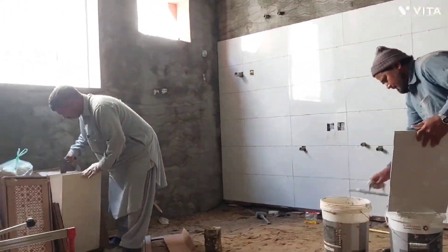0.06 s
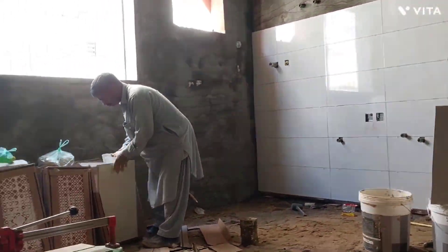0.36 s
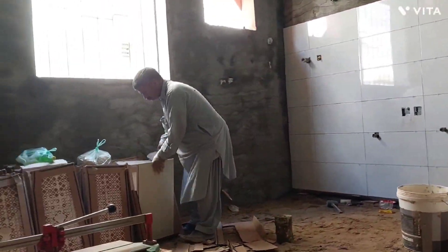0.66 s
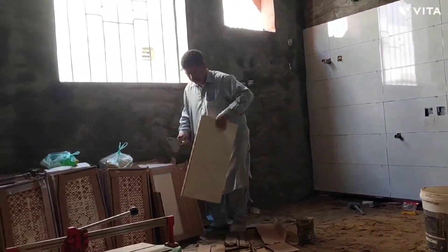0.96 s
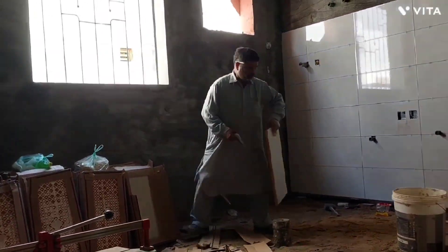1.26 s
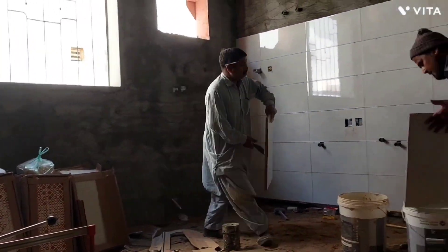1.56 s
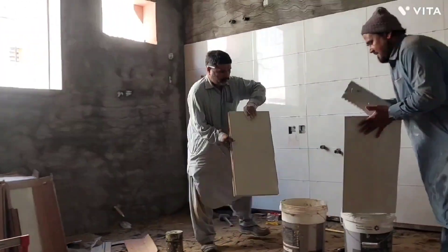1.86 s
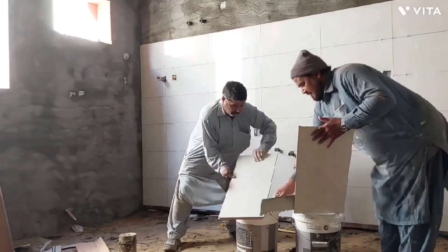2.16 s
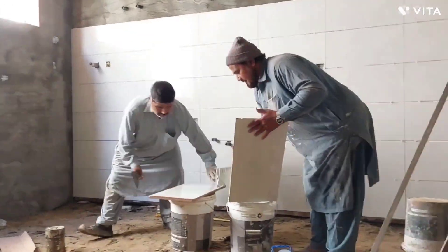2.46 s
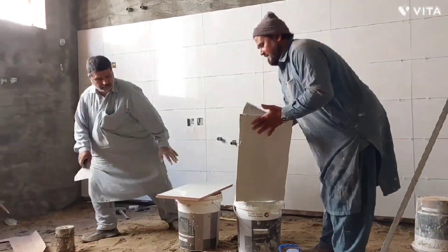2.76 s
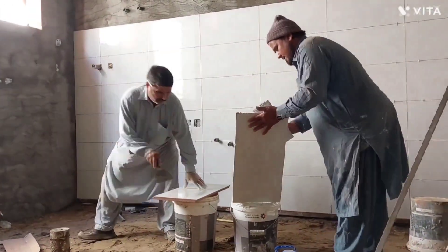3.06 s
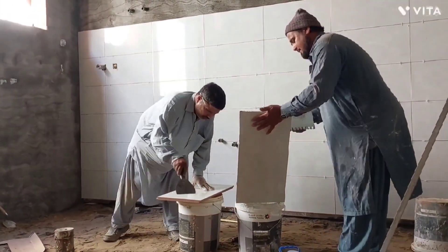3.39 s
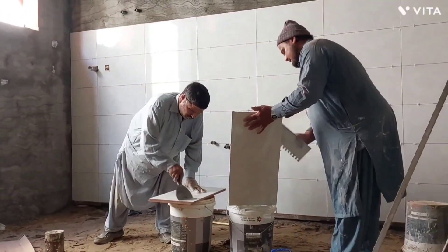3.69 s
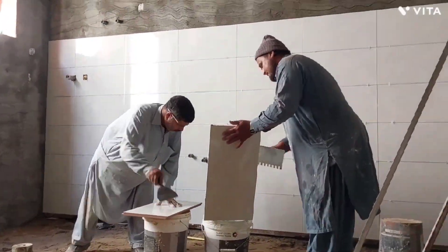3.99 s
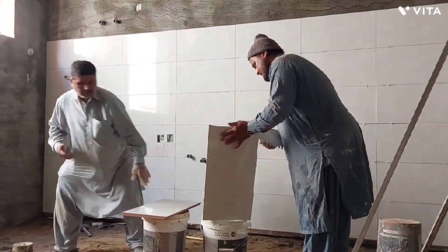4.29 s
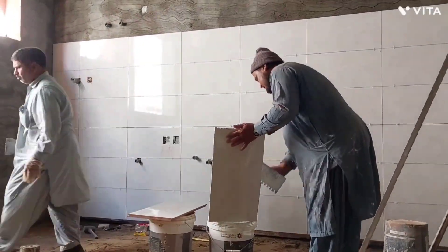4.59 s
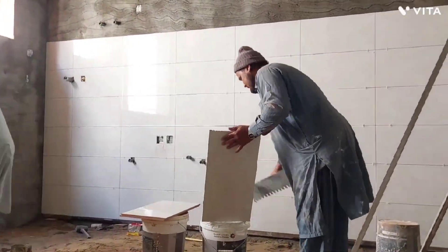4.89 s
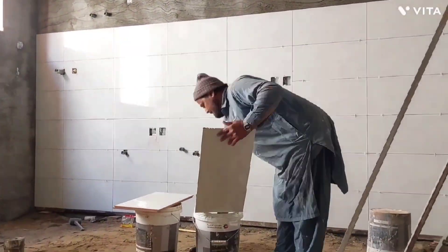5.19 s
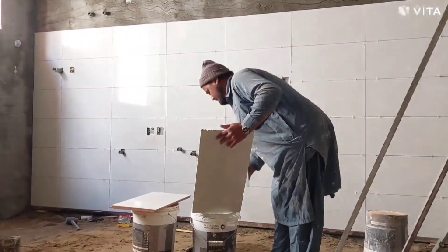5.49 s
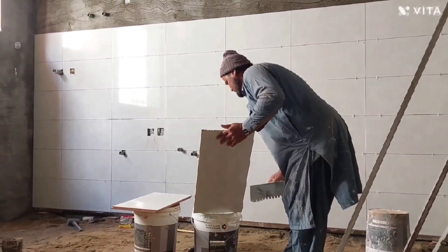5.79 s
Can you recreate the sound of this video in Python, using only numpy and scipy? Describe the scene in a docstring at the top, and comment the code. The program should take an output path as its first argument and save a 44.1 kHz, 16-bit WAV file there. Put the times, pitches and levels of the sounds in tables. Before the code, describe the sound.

Short, sandy trowel scrapes and jabs on tile backs, with faint metal squeaks, shoes on grit and hollow bucket knocks in a bare room.

```python
"""Tilers buttering tiles

Two tilers spread cement mortar on ceramic tiles in a bare, half-tiled room. Each trowel stroke bites
into the sand, drags it over the tile back and lifts off; short jabs make the blade ring and squeak.
Shoes scuff and thud on the gritty floor, and a tile is slid onto a plastic bucket, which booms."""
import sys
import numpy as np
from scipy import signal
from scipy.fft import rfft, irfft, next_fast_len
from scipy.io import wavfile

SR = 44100
rng = np.random.default_rng(int(sys.argv[2]) if len(sys.argv) > 2 else 0)


def file_out(sig):
    """Save sig as 16-bit WAV at sys.argv[1]."""
    # one column per channel
    cols = np.atleast_2d(sig).T
    # limit, then scale
    lim = np.clip(cols, -1, 1)
    pcm = np.round(lim * 32767).astype(np.int16)
    wavfile.write(sys.argv[1], SR, pcm)


N = 266805
TIME = np.arange(N) / SR
FFT_SIZE = next_fast_len(N, True)
HZ = np.maximum(np.arange(FFT_SIZE // 2 + 1) * SR / FFT_SIZE, 1)


def from_db(db):
    """Decibels to gain."""
    return 10 ** (np.asarray(db) / 20)


def unit_rms(x):
    """Scale to unit power."""
    return x / np.sqrt(np.mean(x ** 2) + 1e-20)


def over_hz(points):
    """Join (freq_hz, value) points on a log-frequency axis."""
    hz, value = np.transpose(points)
    return np.interp(np.log(HZ), np.log(hz), value)


def shaped(x, gain):
    """Filter by a frequency response."""
    spectrum = rfft(x.astype(np.float32), FFT_SIZE)
    return irfft(spectrum * gain.astype(np.float32), FFT_SIZE)[..., :N]


def drift(rate_hz, hop=32):
    """Smooth random wander of unit RMS."""
    pole = np.exp(-2 * np.pi * rate_hz * hop / SR)
    slow = signal.lfilter([1], [1, -2 * pole, pole * pole], rng.standard_normal(N // hop + 1002))[1000:]
    return np.interp(np.arange(N) / hop, np.arange(len(slow)), unit_rms(slow))


def resonances(modes):
    """Gain of resonances that add in power."""
    return np.sqrt(sum(from_db(db) ** 2 / (1 + ((HZ ** 2 - hz ** 2) / (HZ * width_hz)) ** 2)
                       for hz, width_hz, db in modes))


def swell(peak_s, rise_s, fall_s):
    """Contact without drag: bell-shaped rise, exponential fall."""
    age_s = TIME - peak_s
    return np.exp(-np.minimum(np.where(age_s < 0, (age_s / rise_s) ** 2, age_s / fall_s), 20))


# left-right likeness: freq_hz, correlation
COHERENCE = [(60, 0.74), (350, 0.86), (750, 0.99), (1200, 0.15), (3000, 0.05), (5800, 0.028), (7200, .82),
             (9300, 0.95), (10200, 0.19), (12000, 1), (15500, .35)]
def stereo(pair, lag_s=0.00021, lag_below_hz=2600):
    """Mix two unrelated signals into left and right; the lows reach the right late."""
    alike = np.clip(over_hz(COHERENCE), -.99, .99)
    mid, side = rfft(pair, FFT_SIZE) * np.sqrt([1 + alike, 1 - alike])
    delay = np.exp(-2j * np.pi * HZ * lag_s * (HZ < lag_below_hz))
    return irfft([mid + side, (mid - side) * delay], FFT_SIZE)[:, :N] / np.sqrt(2)


# still air: freq_hz, density_db
AIR_COLOUR = [(15, -40), (25, -20), (64, 9.5), (185, -11), (249, 5.5), (301, -17), (326, -13), (545, -25.5),
              (1130, -24.5), (1480, -24.5), (1790, -26), (14400, -40.5), (16000, -51)]
def room_air(level_db=-62):
    """Steady, low hush of the room."""
    noise = stereo(rng.standard_normal((2, N)))
    return from_db(level_db) * unit_rms(shaped(noise, from_db(over_hz(AIR_COLOUR))))


def room(x, t60_s=0.2, wall_hz=5000, wet_db=-14, late_t60_s=0.73, late_db=-24.5):
    """Add dense, dulled wall reflections and a faint late echo from the rest of the building."""
    echoes = shaped(stereo(rng.standard_normal((2, N))), 1 / np.hypot(1, HZ / wall_hz))
    decay = (from_db(-60 * TIME / t60_s) + from_db(late_db - 60 * TIME / late_t60_s)) * (TIME > .004)
    response = (echoes * decay / np.sqrt(np.sum(decay ** 2)))[:, :SR // 2]
    return x + from_db(wet_db) * signal.fftconvolve(x, response, axes=1)[:, :N]


def thuds(blows, modes, rise_cycles, spread_octaves, rattle_db):
    """Soft blows build over a few cycles and excite the modes near their pitch; loose contact rattles."""
    forces = np.array([from_db(db) * swell(peak_s, rise_cycles / hz, fall_s)
                       for peak_s, db, fall_s, hz in blows])
    mode_hz, _, mode_db = np.transpose(modes)
    blow_hz = np.array(blows)[:, -1:]
    weights = from_db(mode_db) / (1 + (np.log2(mode_hz / blow_hz) / spread_octaves) ** 4)
    weights /= np.linalg.norm(weights, axis=1, keepdims=True)
    envelopes = np.sqrt(weights.T ** 2 @ forces ** 2)
    out = 0
    for envelope, (hz, width_hz, _) in zip(envelopes, modes):
        phase = 2 * np.pi * np.cumsum(hz + width_hz / 3 * drift(23.57)) / SR
        rattle = from_db(rattle_db) * drift(93) * np.cos(phase)
        out += envelope * np.sqrt(2) * (np.sin(phase) + rattle)
    return out


# footfalls: peak_s, level_db, fall_s, pitch_hz
STEPS = [(0.59, -44, 0.14, 154), (0.938, -35, 0.028, 103.4), (1.08, -49, 0.095, 163.2),
         (1.36, -46, 0.11, 109), (1.48, -33.5, .039, 165), (3.176, -43.5, .026, 208),
         (4.19, -48.5, .024, 129), (4.45, -68.5, .1, 108), (4.88, -40, 0.06, 253),
         (5.295, -37.5, 0.065, 162.7)]
# floor and room modes: pitch_hz, width_hz, level_db
FLOOR_MODES = [(79.8, 22, -1.5), (131, 29, -1.5), (197, 36, -17), (231, 28.8, -1.5), (373, 33, -3)]
def footsteps():
    """Shoes thud into the low modes of floor and room."""
    return thuds(STEPS, FLOOR_MODES, rise_cycles=4, spread_octaves=1.0, rattle_db=-4.5)


# tile on bucket: peak_s, level_db, fall_s, pitch_hz
BUMPS = [(2.312, -25.5, 0.027, 238), (2.32, -36.5, 0.13, 80), (2.518, -25, 0.052, 320),
         (2.54, -35.5, 0.079, 90), (2.578, -26, .02, 251.3), (2.612, -25, 0.0077, 178.4),
         (2.685, -40.5, .018, 154.8), (5.67, -30.5, 0.059, 267), (5.96, -32.5, .05, 280)]
# bucket modes: pitch_hz, width_hz, level_db
BUCKET_MODES = [(75, 24, -4.5), (123, 36, -3), (199.4, 25, -8), (230.8, 28, 0), (318, 49.5, -1),
                (498, 55, -14), (778, 37, -21.5)]
def bucket_bumps():
    """A tile knocks the plastic bucket, which booms."""
    return thuds(BUMPS, BUCKET_MODES, rise_cycles=2.7, spread_octaves=0.61, rattle_db=-0.5)


# lift-offs: start_s, level_db
LIFTS = [(0.23, -57.5), (3.51, -60), (4.135, -47.5)]
# free blade modes: pitch_hz, level_db, t60_s
FREE_BLADE_MODES = [(1917, 3, 0.17), (2556, -14, 0.33), (2929, 0, 0.16), (3680, -4.5, 0.15),
                    (6060, -22.5, 0.5), (8500, -15, 0.27)]
def blade_rings():
    """Freed from the mortar, the steel rings on faintly."""
    flicks, out = np.zeros(N), 0
    for start_s, db in LIFTS:
        flicks[round(start_s * SR)] = from_db(db)
    for hz, db, t60_s in FREE_BLADE_MODES:
        radius, angle = from_db(-60 / (t60_s * SR)), 2 * np.pi * hz / SR
        poles = [1, -2 * radius * np.cos(angle), radius ** 2]
        out += from_db(db) * signal.lfilter([0, np.sin(angle)], poles, flicks + 1e-18)
    return out


# stick-slip tones: peak_s, level_db, rise_s, pitch_hz
SQUEALS = [(0.045, -38, 0.023, 394), (0.181, -29, 0.0098, 395), (0.208, -30, 0.013, 2283),
           (0.3, -44, 0.024, 390), (1.897, -30.5, 0.024, 659), (2.448, -20.5, .03, 342),
           (2.57, -32.5, .069, 768), (3.484, -33, 0.0095, 3010), (3.502, -31.5, 0.015, 2206),
           (3.93, -30.5, .018, 2966), (4.0, -33.5, .022, 876), (5.514, -37.5, .031, 350),
           (5.963, -37, 0.017, 2290)]
def squeals(waver=.014, rough_db=3.5, fall_s=.015):
    """Slips briefly fall in step with one mode and sing, slightly unsteady."""
    warped_s = np.cumsum(1 + waver * drift(60)) / SR
    tones = sum(from_db(db) * swell(peak_s, rise_s, fall_s) * np.sin(2 * np.pi * hz * warped_s)
                for peak_s, db, rise_s, hz in SQUEALS)
    return np.sqrt(2) * tones * from_db(rough_db * drift(90))


# edge judders: peak_s, level_db, rise_and_fall_s, pitch_hz
CHATTERS = [(1.856, -23, 0.016, 742), (1.893, -29, 0.054, 488), (2.314, -27, .03, 934),
            (2.579, -32.5, 0.014, 623), (2.865, -25, 0.023, 698), (2.931, -24, 0.035, 838),
            (2.92, -26, 0.044, 2100), (3.98, -35, 0.044, 893), (5.596, -26, 0.014, 1826),
            (5.713, -33, 0.028, 664), (5.972, -35, .017, 2450)]
def chatters(grains, width_ratio=0.47):
    """Pressed harder, the edge judders in one broad resonance set by its place on the tile."""
    out = 0
    for peak_s, db, ramp_s, hz in CHATTERS:
        band = signal.butter(1, [hz * (1 - width_ratio / 2), hz * (1 + width_ratio / 2)], "band", fs=SR)
        judder = unit_rms(signal.lfilter(*band, signal.lfilter(*band, grains)))
        out += from_db(db) * swell(peak_s, ramp_s, ramp_s) * judder
    return out


def mode_ripple(spacing_hz=75, depth_db=4.6):
    """One contact point favours some of a plate's close modes and misses others."""
    grid_hz = np.arange(0, SR / 2, spacing_hz)
    ripple = np.interp(HZ, grid_hz, rng.uniform(-1.7, 1.7, 1200)[:len(grid_hz)])
    return unit_rms(from_db(depth_db * ripple * HZ / (HZ + 300)))


def travelling(grains, points=4):
    """The edge travels over the plate, so the favoured modes keep changing."""
    nearness = np.array([np.exp(2 * drift(7)) for _ in range(points)])
    nearness /= nearness.sum(axis=0)
    return unit_rms(sum(near * shaped(grains, mode_ripple()) for near in nearness))


def grit(grains_per_s, size_db, paste_db, slip_db, slip_hz):
    """Sand grains crack over a smooth smear of paste; the edge sticks and slips."""
    sizes = from_db(size_db * np.minimum(rng.exponential(1, N), 3))
    struck = rng.random(N) < grains_per_s / SR
    cracks = unit_rms(sizes * struck * np.sign(rng.standard_normal((2, N))))
    paste = from_db(paste_db) * rng.standard_normal((2, N))
    rubbing = travelling(stereo(cracks + paste))
    return unit_rms(rubbing * from_db(slip_db * np.clip(drift(slip_hz), -2, 2)))


def pressure(age_s, rise_s, drag_s, fall_s):
    """Pressure comes on until age zero, holds through the drag, then lets go."""
    onset = (np.maximum(-age_s, 0) / rise_s) ** 1.09
    release = np.maximum(age_s - drag_s, 0) / fall_s
    return np.exp(-np.minimum(onset + release, 20))


def stroke_gains(strokes, falls_s, hollowing_db, dulling_db):
    """Body, rasp and hiss envelopes, in the order of falls_s; heaping mortar hollows and dulls a stroke.
    level_db is the rasp at mid-drag, body_db and hiss_db are relative to it, swell_db spans the drag."""
    power = np.zeros((3, N))
    for contact_s, rise_s, drag_s, level_db, swell_db, body_db, hiss_db, _ in strokes:
        span = slice(*np.searchsorted(TIME, [contact_s - 4 * rise_s, contact_s + drag_s + .3]))
        age_s = TIME[span] - contact_s
        along = np.clip(age_s / drag_s, 0, 1) - .5
        offsets_db = [body_db + hollowing_db * along, 0, hiss_db - dulling_db * along]
        for band, (offset_db, fall_s) in enumerate(zip(offsets_db, falls_s)):
            gain = from_db(level_db + swell_db * along + offset_db)
            power[band, span] += (gain * pressure(age_s, rise_s, drag_s, fall_s)) ** 2
    return np.sqrt(power)


def friction(gains, grains, colour, modes, ring_db, bands_db):
    """Grains drive the rubbed object's modes in three bands: body, rasp, hiss."""
    tone = np.hypot(from_db(over_hz(colour)), from_db(ring_db) * resonances(modes))
    above_body, above_rasp = 1 / (1 + (1300 / HZ) ** 6), 1 / (1 + (6500 / HZ) ** 8)
    shares = [1 - above_body, above_body - above_rasp, above_rasp]
    ranges_hz = [(400, 1300), (1300, 6000), (7000, 16000)]
    out = 0
    for share, (low_hz, high_hz), gain, db in zip(shares, ranges_hz, gains, bands_db):
        band_rms = np.sqrt(np.mean(tone ** 2 * (HZ > low_hz) * (HZ < high_hz)))
        out += from_db(db) * gain * shaped(grains, share * tone / band_rms)
    return out


# slides on grit: contact_s, rise_s, drag_s, level_db, swell_db, body_db, hiss_db, bite_db
SCUFFS = [(0.327, 0.017, .16, -63.5, -8, 4, -5.5, -21), (0.54, 0.03, 0.19, -40.5, 1, -0.5, -3.5, -18),
          (0.572, .006, 0.014, -28, -3, -11, -1.5, -8), (0.76, .03, .12, -54, -15, 3, 1, -18.5),
          (0.911, 0.0068, .025, -42.5, 0.5, -1.5, -11.5, -1.5),
          (0.961, .003, 0.063, -44, 3.5, 1.5, -6.5, 6), (1.042, 0.033, 0.032, -32.5, -1, 1.5, -4, -17.5),
          (1.306, 0.0058, 0.013, -56, 4.5, 6, -8, 6.5), (1.345, 0.012, 0.017, -44.5, -4, -2.5, 0, -16.5),
          (1.404, 0.013, 0.006, -42, -12.5, 4, 0.5, -7), (1.485, 0.022, .13, -52.5, -14.5, -5.5, -1.5, -17),
          (1.655, .02, .04, -66.5, 1.5, -20.5, 4.5, -19.5), (2.168, .006, 0.041, -53.5, 2.5, -0.5, -8, -10),
          (2.212, .009, 0.11, -31, 4.5, -10, -3, -4.5), (2.36, 0.014, 0.079, -27.5, -5.5, -4.5, -12, -15),
          (2.507, 0.0049, 0.035, -29.5, -4, 2, -16, -10), (3.161, 0.0069, 0.06, -63, -8.5, 8.5, -17, -5.5),
          (4.402, .006, 0.037, -58.5, -3, -4, -5, -10.5), (4.44, 0.0093, 0.049, -48.5, 2, 0, -12.5, -8.5),
          (4.57, .012, 0.026, -61, -6.5, -13, -18.5, -12)]
# scuff spectrum: freq_hz, density_db
SCUFF_COLOUR = [(24, -37.5), (40, -1.5), (176, -5.5), (329, 3), (615, -5), (715, 0.5), (990, -4.5),
                (1760, -8), (2150, -9), (2700, -11), (5720, -16.5), (6820, -17), (9940, -22),
                (11800, -17.5), (16000, -25)]
# sliding slab modes: pitch_hz, width_hz, level_db
SLAB_MODES = [(230, 21, 3.5), (714, 29, -32), (1231, 20, 1.5), (1873, 130, -17.5), (2290, 60, -13)]
def scuffs(sand):
    """Shoes and tiles slide on grit."""
    gains = stroke_gains(SCUFFS, falls_s=(.031, .029, .03), hollowing_db=6, dulling_db=0.5)
    return friction(gains, sand, SCUFF_COLOUR, SLAB_MODES, ring_db=-0.5, bands_db=(-1, 0.8, -3.3))


def bites(grains, strokes, low_hz=150, top_hz=7000, rise_s=.0044, fall_s=.01):
    """Each stroke opens with a crunch of coarse sand, bite_db relative to its first pressure."""
    colour = from_db(over_hz(SCUFF_COLOUR)) / np.hypot(1, HZ / top_hz) / np.hypot(1, low_hz / HZ)
    envelope = sum(from_db(level_db - swell_db / 2 + bite_db) * swell(contact_s, rise_s, fall_s)
                   for contact_s, _, _, level_db, swell_db, _, _, bite_db in strokes)
    return envelope * unit_rms(shaped(grains, colour))


# scoops: contact_s, rise_s, drag_s, level_db, swell_db, body_db, hiss_db, bite_db
DIGS = [(0.003, 0.0071, 0.046, -27.5, -9, -6, -16, -13.5), (0.153, 0.002, 0.048, -25.5, 0, -6.5, -15, -9)]
# dig spectrum: freq_hz, density_db
DIG_COLOUR = [(24, -43.5), (40, -21), (133, -4.5), (220, -31.5), (392, -1.5), (503, -20.5), (831, -7),
              (1630, -12), (2260, -6.5), (2500, -19), (2910, -19.5), (6330, -25), (16000, -29.5)]
# scooping trowel modes: pitch_hz, width_hz, level_db
SCOOP_MODES = [(375, 20, 0), (905, 60, -6), (1500, 13, -12), (2353, 50, -6), (2914, 140, -4.5),
               (3970, 39, -8.5), (3970, 310, -13.5), (4130, 56, -3.5), (4580, 58, -7), (5120, 23, -4),
               (5450, 47, -18.5), (6050, 22, -15), (6380, 120, -10.5), (6700, 82, -18), (7400, 36, -21.5),
               (8100, 84, -18)]
def digs(mortar):
    """The trowel digs into the mortar bucket."""
    gains = stroke_gains(DIGS, falls_s=(.036, .027, .028), hollowing_db=9, dulling_db=-1)
    return friction(gains, mortar, DIG_COLOUR, SCOOP_MODES, ring_db=0, bands_db=(-0.1, 1.2, -1))


# cuts into the bucket mortar: contact_s, rise_s, drag_s, level_db, swell_db, body_db, hiss_db, bite_db
BUCKET_CUTS = [(5.08, 0.028, 0.098, -69.5, 1.5, -15.5, -5.5, -19.5),
               (5.199, .008, 0.14, -53.5, -5.5, 0, -5.5, -4), (5.365, 0.0055, 0.26, -45.5, 6.5, 2.5, -9, 1.5),
               (5.576, 0.021, 0.025, -32.5, -3, 1.5, -10, -1.5), (5.667, 0.017, 0.14, -41, -13.5, 3.5, -7, -13),
               (5.853, 0.02, .085, -40.5, 1.5, 0.5, -9.5, -4), (5.957, 0.015, 0.023, -35, -5.5, -6, -14.5, -11.5),
               (6.033, 0.01, 0.016, -37, -0.5, -5.5, -13.5, -2)]
# bucket-cut spectrum: freq_hz, density_db
CUT_COLOUR = [(24, -38), (40, -10), (312, -12.5), (1040, -6), (1210, -7.5), (1440, -11.5), (1760, -8),
              (3220, -12.5), (3930, -14), (7540, -23.5), (9690, -33.5), (12800, -24), (16000, -30.5)]
# modes of the trowel cutting into the bucket mortar: pitch_hz, width_hz, level_db
CUTTING_TROWEL_MODES = [(269, 91, -1), (1210, 40, -3), (1800, 28, -19), (2090, 180, -6), (4082, 420, -12.5),
                        (4300, 45, -14), (5750, 28, -30), (6160, 140, -22), (7660, 78, -19.5)]
def bucket_cuts(sand):
    """The trowel scoops and cuts into the mortar in the bucket."""
    gains = stroke_gains(BUCKET_CUTS, falls_s=(.029, .021, .03), hollowing_db=4, dulling_db=3)
    return friction(gains, sand, CUT_COLOUR, CUTTING_TROWEL_MODES, ring_db=-0.5, bands_db=(-0.8, 0.95, -0.4))


# edge strokes: contact_s, rise_s, drag_s, level_db, swell_db, body_db, hiss_db, bite_db
JABS = [(3.479, 0.01, 0.017, -29, 4, -5.5, -10.5, -8), (3.644, 0.007, .024, -44.5, 1, -2.5, -9.5, 3.5),
        (3.899, 0.0027, .015, -35.5, 2.5, -24.5, -1.5, -10),
        (3.916, 0.006, .085, -29.5, -2.5, -5, -11.5, -16.5),
        (4.1, 0.0025, 0.021, -28.5, -0.5, -5, -11.5, -7.5)]
# jab spectrum: freq_hz, density_db
JAB_COLOUR = [(24, -44), (40, -13.5), (392, -1), (697, -10), (831, -3.5), (1020, -15.5), (1520, -3),
              (2260, -1), (2500, -3), (2980, -4), (3650, -6), (3930, -2), (9690, -40), (12800, -31),
              (16000, -38.5)]
# jabbing blade modes: pitch_hz, width_hz, level_db
BLADE_MODES = [(375, 26, -4.5), (810, 51, -4.5), (1180, 85, -4), (1328, 32, -20), (2306, 48, 2.5),
               (2940, 30, 4), (3870, 110, -8.5), (4600, 36, -24), (4100, 52, -16), (4670, 43, -8),
               (6150, 35, -18.5), (6400, 39, -16), (7040, 100, -20.5), (8210, 61, -22)]
def jabs(mortar):
    """Short jabs with the edge excite the steel blade."""
    gains = stroke_gains(JABS, falls_s=(.029, .021, .021), hollowing_db=6, dulling_db=2.5)
    return friction(gains, mortar, JAB_COLOUR, BLADE_MODES, ring_db=3, bands_db=(-0.04, 1.26, 0.5))


# buttering strokes: contact_s, rise_s, drag_s, level_db, swell_db, body_db, hiss_db, bite_db
SWEEPS = [(1.708, 0.0069, 0.045, -46.5, 5.5, 1, -7.5, -6.5),
          (1.755, .012, .075, -37, 6.5, 6.5, -5.5, -19.5), (1.837, 0.01, 0.17, -33.5, -4, 4, -6.5, -5),
          (2.755, 0.0047, 0.036, -51.5, 10, -8.5, -12, -1.5), (2.8, .005, 0.047, -34, -2.5, 1, -20, -6),
          (2.846, 0.014, 0.16, -27.5, -2.5, -4, -13.5, -15.5), (3.304, .008, 0.011, -51.5, 7, -4, -15, -6),
          (3.322, 0.0046, .025, -42, 1, -8.5, -11.5, -9), (3.354, 0.019, 0.057, -30.5, 2.5, -10, -7, -23.5),
          (4.834, 0.006, .025, -44.5, 7, -0.5, 0, -1.5), (4.865, 0.014, 0.093, -33.5, 3.5, -8, -6, -25)]
# sweep spectrum: freq_hz, density_db
SWEEP_COLOUR = [(24, -48.5), (40, -28), (99, -13), (176, -18.5), (237, -2.5), (770, -3.5), (990, -6.5),
                (1210, -4.5), (1440, -10.5), (2770, -9.5), (5310, -16), (7730, -17), (9940, -22),
                (12100, -16), (16000, -22.5)]
# buttered tile modes: pitch_hz, width_hz, level_db
TILE_MODES = [(830, 96, 0.5), (1107, 67, -12), (1685, 240, -4), (2300, 340, -8), (2640, 79, -20)]
def sweeps(mortar):
    """The trowel touches down lightly, then bears on and drags mortar over the tile."""
    gains = stroke_gains(SWEEPS, falls_s=(.028, .022, .016), hollowing_db=5, dulling_db=1)
    return friction(gains, mortar, SWEEP_COLOUR, TILE_MODES, ring_db=-3, bands_db=(-0.15, 1.53, -0.3))


# stereo balance: freq_hz, left_over_right_db
BALANCE = [(100, 1.4), (1000, -1), (2500, -1), (8000, -2), (13000, -1.2)]
def scene():
    """Feet, bucket and trowels in the room; mids and highs lean a little to the right."""
    mortar = grit(grains_per_s=5000, size_db=2.5, paste_db=0.9, slip_db=1.18, slip_hz=90)
    sand = grit(grains_per_s=4000, size_db=-0.5, paste_db=0.5, slip_db=1.45, slip_hz=70)
    reversed_sand = sand[:, ::-1]
    movement = footsteps() + bucket_bumps() + scuffs(sand)
    ringing = blade_rings() + squeals() + chatters(reversed_sand)
    crunches = bites(reversed_sand, SCUFFS + DIGS + BUCKET_CUTS + JABS + SWEEPS)
    trowels = digs(mortar) + bucket_cuts(sand) + jabs(mortar) + sweeps(mortar)
    mix = room_air() + room(movement + ringing + crunches + trowels)
    return shaped(mix, from_db(over_hz(BALANCE) * [[.5], [-.5]]))


def record(dry):
    """Steep low-pass."""
    cutoff_hz = 15900
    return signal.sosfilt(signal.ellip(12, .1, 80, cutoff_hz, fs=SR, output="sos"), dry)


dry = scene()
out = record(dry)
file_out(out)
```